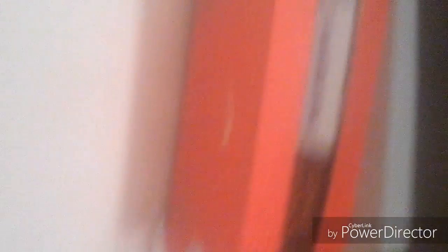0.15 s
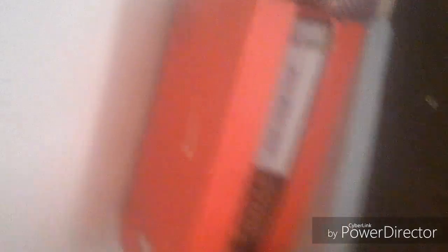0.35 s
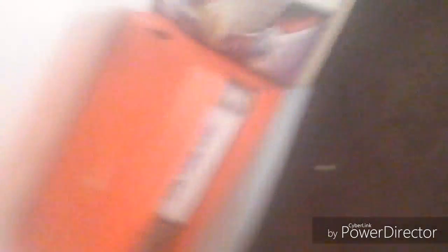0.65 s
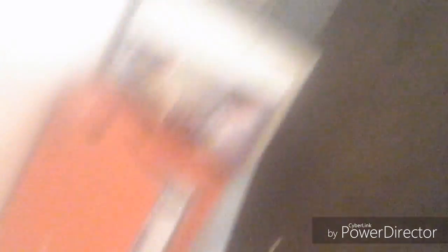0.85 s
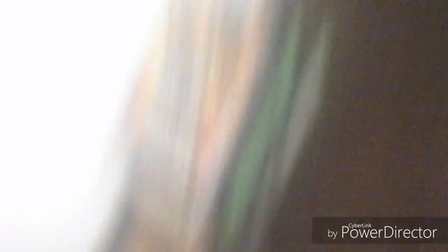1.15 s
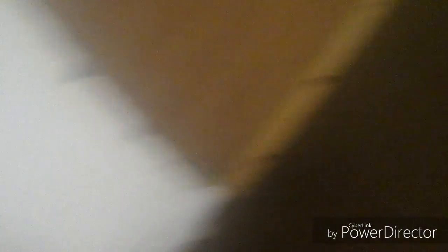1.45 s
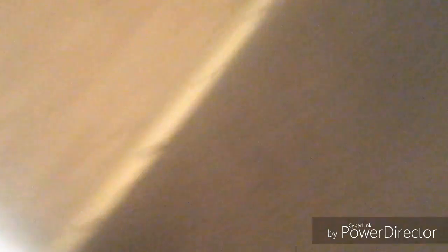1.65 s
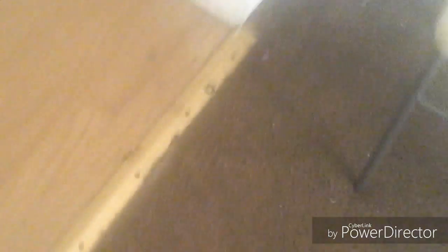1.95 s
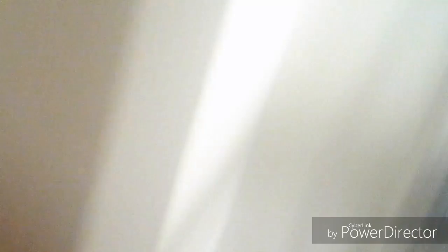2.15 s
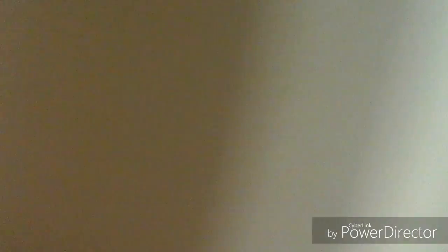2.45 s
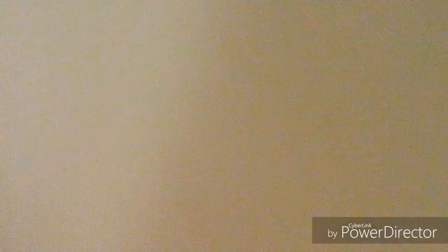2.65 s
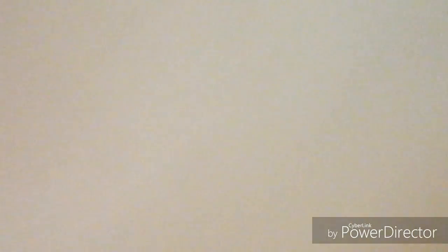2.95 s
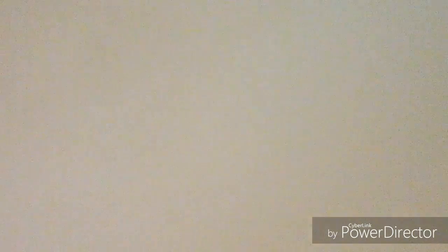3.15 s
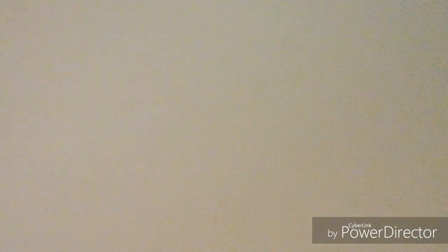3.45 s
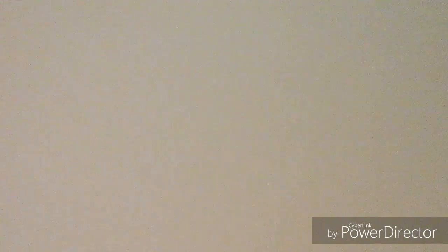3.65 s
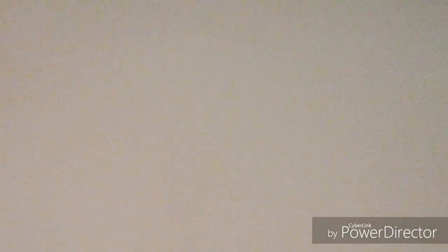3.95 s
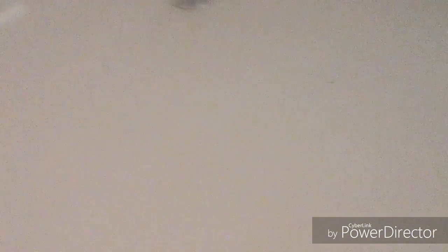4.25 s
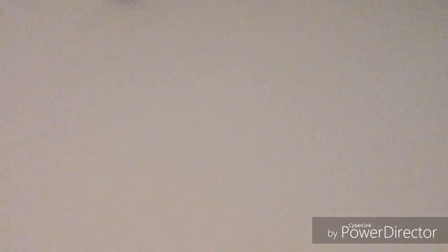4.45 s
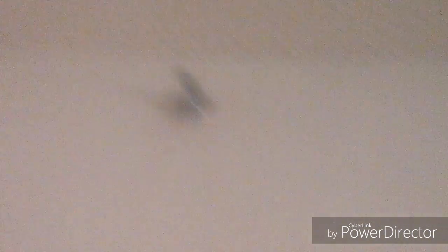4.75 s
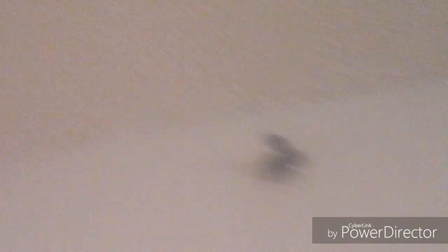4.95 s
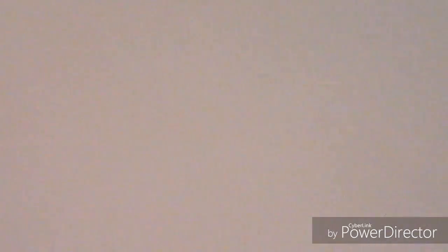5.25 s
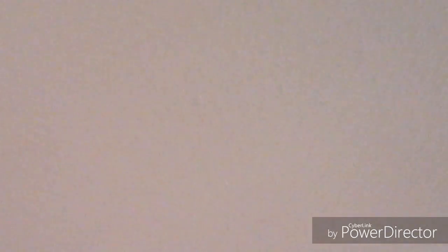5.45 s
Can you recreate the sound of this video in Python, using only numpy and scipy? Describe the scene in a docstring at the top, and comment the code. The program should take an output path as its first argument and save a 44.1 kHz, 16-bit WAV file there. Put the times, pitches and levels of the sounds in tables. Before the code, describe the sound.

Very close handling noise on a small camera's microphone dominates. Low bumps lead to one hard crack, rapid knocks, palm rubbing and a brief low groan, then a rough fingertip squeak that jumps up in pitch and ends in a knock. Before and after, dull footsteps from the floor above thump softly in a still indoor room with faint hiss and low hum.

```python
"""In a flat, dull footfalls come through the ceiling while someone swings a small camera up to point at it.
The footfalls are damped low modes of the ceiling; the hand's knocks push the case and ring its modes.
Friction makes the rubs, a groan and a sleeve's brush as clumped noise or slow slipping tones, and
stick-slip makes a loud squeaky scrape. Handling travels through the case, so it is dry; footfalls ring on.
Under it all lie still room air, microphone hiss and a faint low drone."""
import sys
import numpy as np
from scipy import signal
from scipy.fft import rfft, irfft
from scipy.io import wavfile
from scipy.ndimage import uniform_filter1d

SR = 44100
rng = np.random.default_rng(int(sys.argv[2]) if len(sys.argv) > 2 else 0)


def output_pcm(signal):
    """Save a mono or channel-first signal as 16-bit PCM at the path in sys.argv[1].

    Samples are clipped to [-1, 1] before scaling.
    """
    pcm = np.clip(np.atleast_2d(signal).T, -1, 1) * 32767
    wavfile.write(sys.argv[1], SR, np.round(pcm).astype(np.int16))


N = 246474
TIME = np.arange(N) / SR
EDGE_HZ = 15550  # upper band limit


def amp(db):
    """Level law: decibels to amplitude gain."""
    return 10 ** (np.asarray(db) / 20)


def unit(x):
    """Power normalisation: scales to rms 1."""
    return x / np.sqrt(np.mean(x ** 2) + 1e-20)


def crest(x):
    """Peak normalisation: scales the Hilbert envelope to a peak of 1."""
    return x / abs(signal.hilbert(x)).max()


def add(mix, s, sound):
    """Linear superposition: adds a sound to the mix from time s, in place."""
    part = mix[max(round(s * SR), 0):][:len(sound)]
    part += sound[:len(part)]


def curves(rows, t):
    """Linear interpolation: one curve for each column after the time column."""
    s, *columns = np.transpose(rows)
    return [np.interp(t, s, column) for column in columns]


def response(points, size=4096):
    """Minimum phase: the causal impulse response whose phase follows from its log spectrum."""
    hz, db = np.transpose(points)
    bin_hz = abs(np.fft.fftfreq(size, 1 / SR)) + 1  # the 1 avoids log of zero
    log_gain = np.log(amp(np.interp(np.log(bin_hz), np.log(hz), db)))
    spectrum = np.exp(np.conj(signal.hilbert(log_gain)))
    return np.fft.ifft(spectrum).real[:size // 2]


def colour(x, points):
    """Linear filtering: shapes x by a spectrum and scales it to rms 1."""
    return unit(signal.oaconvolve(x, response(points))[:len(x)])


def band(x, low_hz, high_hz, order=4):
    """Butterworth band-pass: maximally flat between its edges."""
    edges = [low_hz, min(high_hz, SR / 2 - 1)]
    return signal.sosfilt(signal.butter(order, edges, "band", fs=SR, output="sos"), x)


def wander(hz):
    """Band-limited Gaussian noise: random change slower than a given rate, rms 1."""
    spectrum = rfft(rng.standard_normal(N))
    return unit(irfft(spectrum * (np.fft.rfftfreq(N, 1 / SR) < hz), N))


def friction(points, grain_db, grain_hz):
    """Sliding friction: noise that comes in clumps as the surfaces catch."""
    clumps = amp(grain_db * wander(grain_hz))
    return colour(rng.standard_normal(N) * clumps, points)


# Still air of the room and microphone hiss. Each row: frequency in Hz, relative density in dB per Hz.
AIR = [(15, -37.5), (25, -12), (48, -6.5), (126, 8.5), (331, -12.5), (368, -11), (457, -2.5), (567, -19),
       (1240, -21.5), (1340, -30.5), (1800, -35), (2490, -34), (15500, -36.5)]


def room_air(level_db=-72):
    """Stationary noise: a steady random floor with a fixed spectrum."""
    return amp(level_db) * colour(rng.standard_normal(N), AIR)


# Rise and fall of the drone. Each row: time in seconds, level in dB.
DRONE_LEVEL = [(0, -63), (.7, -62.5), (1.5, -62), (3.9, -62.5), (4.3, -61.5), (4.45, -69.5), (4.6, -62),
               (5.58, -67.5)]
# Spectrum of the drone. Each row: frequency in Hz, relative density in dB per Hz.
DRONE_COLOUR = [(20, -13.5), (50, -5), (85, -5), (118, -2), (150, -8), (220, -24), (500, -50)]


def drone():
    """Amplitude modulation: faint low noise swells and sinks."""
    level_db, = curves(DRONE_LEVEL, TIME)
    return amp(level_db) * colour(rng.standard_normal(N), DRONE_COLOUR)


# Footfalls overhead. Each row: start in seconds, level in dB before the mode levels,
# pitch of the ceiling in Hz, decay time t60 in seconds.
STEPS = [(0.746, -46.5, 88.5, 0.64), (.835, -49.5, 82.6, 0.32), (1.515, -37, 116, 0.058),
         (3.534, -34.5, 142, 0.11), (3.603, -44, 66.4, 0.22), (3.736, -38.5, 122, 0.16),
         (4.099, -54.5, 56, 0.47), (4.224, -45, 187.4, 0.16), (4.581, -47.5, 132.5, 0.27),
         (4.66, -44.5, 62, 0.23), (5.188, -45, 109, 0.15)]
# Modes of the ceiling. Each row: multiple of its pitch, level in dB.
CEILING_MODES = [(1, 4), (1.17, 0), (.62, -7), (1.9, -31), (3.1, -43)]
# Low spectrum of the footfall rumble and the palm's drag. Each row: frequency in Hz, relative density in dB per Hz.
DRAG_COLOUR = [(20, -21.5), (45, -11), (80, 0), (120, 0), (190, -0.5), (300, -2), (420, -14), (700, -24),
               (1500, -62)]


def footfalls(rise_s=0.01, rumble_db=-11):
    """Modal excitation: each heel sets a few damped low ceiling modes swinging; the room adds a rumble."""
    out = np.zeros(N)
    t = np.arange(SR // 2) / SR
    for s, level_db, hz, t60 in STEPS:
        swing = sum(amp(mode_db) * np.sin(2 * np.pi * hz * multiple * t) for multiple, mode_db in CEILING_MODES)
        rumble = amp(rumble_db) * colour(rng.standard_normal(len(t)), DRAG_COLOUR)
        envelope = amp(level_db - 60 * t / t60) * (1 - np.exp(-t / rise_s))
        add(out, s, envelope * (swing + rumble))
    return out


# A hollow tone as the hand cups the case. Each row: time in seconds, centre in Hz, level in dB.
HOLLOW = [(3.63, 1280, -91), (3.67, 1330, -66), (3.72, 1380, -73), (3.77, 1400, -74), (3.84, 1330, -78),
          (3.9, 1300, -91)]


def hollow(half_width_hz=120):
    """Narrow-band resonance: rubbing noise is confined around one moving centre frequency."""
    hz, level_db = curves(HOLLOW, TIME)
    angle = 2 * np.pi * np.cumsum(hz) / SR
    sounding = (TIME > HOLLOW[0][0]) * (TIME < HOLLOW[-1][0])
    tone = wander(half_width_hz) * np.cos(angle) + wander(half_width_hz) * np.sin(angle)
    return sounding * amp(level_db) * tone


# Spectrum of cloth on the case. Each row: frequency in Hz, relative density in dB per Hz.
BRUSH_COLOUR = [(40, -27), (90, -4), (200, -1.5), (380, -1.5), (520, -6), (720, -6.5), (1000, -11.5),
                (1500, -16), (2050, -24), (2600, -17), (3200, -24.5), (4400, -31.5), (5300, -46.5),
                (8000, -67)]


def brush(start_s=1.645, attack_s=0.013, hold_s=0.012, level_db=-40, fade_db_per_s=126):
    """Textile friction: a sleeve lands on the case and slides off with an exponential fade."""
    t = TIME - start_s
    fade_db = fade_db_per_s * np.maximum(t - attack_s - hold_s, 0)
    envelope = np.clip(t / attack_s, 0, 1) * amp(level_db - fade_db)
    return envelope * friction(BRUSH_COLOUR, grain_db=1.5, grain_hz=200)


# The hand sliding faster and slower. Each row: time in seconds, level of the sliding rasp in dB.
RUB = [(0, -83.5), (1.45, -77), (1.85, -69.5), (1.94, -42.5), (2.04, -54.5), (2.25, -46.5), (2.42, -54.5),
       (2.49, -47.5), (2.6, -56.5), (2.73, -52.5), (2.88, -48.5), (3.02, -31), (3.18, -69.5), (3.42, -70),
       (3.68, -67.5), (4.05, -77), (4.28, -73), (4.45, -84.5), (4.62, -75), (4.9, -71), (5.01, -62.5),
       (5.14, -69.5), (5.58, -83)]
# Shoves as the hand shifts its grip. Each row: time of the height in seconds, length in seconds,
# drag level in dB, hiss relative to drag in dB.
SHOVES = [(1.535, 0.14, -48.5, -56), (1.884, .07, -41, -21), (1.983, 0.12, -36, -19.5),
          (2.246, 0.024, -30.5, -9), (2.275, 0.19, -39.5, -13), (2.386, 0.23, -40.5, -13.5),
          (2.696, 0.15, -33, -25), (2.748, .22, -53, -12.5), (2.876, .16, -50.5, -6.5),
          (3.077, 0.19, -37, -13), (3.278, 0.12, -36, -24), (3.493, 0.089, -44, -27.5),
          (3.631, 0.23, -52.5, -44), (3.858, 0.15, -52, -42), (4.275, .11, -46.5, -42),
          (4.68, 0.2, -52, -50), (4.897, 0.2, -44.5, -29.5), (5.023, 0.25, -44.5, -42),
          (5.295, 0.16, -46.5, -32.5)]
# The drag lies above the sliding rasp (dB) until it levels off (dB).
DRAG_OVER_DB, DRAG_LIMIT_DB = 12, -41.5
# The hiss relative to the rasp (dB) when the rasp is at FAST_DB, and its extra growth (dB per dB).
HISS_OVER_DB, FAST_DB, HISS_GROWTH = -14, -45, .14
# A shove swells for this share of its length and fades for the rest, by this many dB each way.
SHOVE_RISE, SHOVE_DEPTH_DB = .42, 19.5
# A shove's rasp relative to its drag (dB), plus this share of its hiss relative to drag.
SHOVE_RASP_DB, SHOVE_RASP_SHARE = -7, 0.28


def hand():
    """Power summation: gains of drag, rasp and hiss follow the sliding, and each shove adds a swell."""
    slide_db, = curves(RUB, TIME)
    drag = 1 / (amp(-slide_db - DRAG_OVER_DB) + amp(-DRAG_LIMIT_DB))
    hiss = amp(slide_db + HISS_OVER_DB + HISS_GROWTH * (slide_db - FAST_DB))
    power = np.array([drag, amp(slide_db), hiss]) ** 2
    for s, length_s, drag_db, hiss_db in SHOVES:
        before = (s - TIME) / SHOVE_RISE
        after = (TIME - s) / (1 - SHOVE_RISE)
        away = np.maximum(before, after) / length_s
        near = away < 2  # farther off the shove is left out
        rasp_db = SHOVE_RASP_DB + SHOVE_RASP_SHARE * hiss_db
        shares = amp([[0], [rasp_db], [hiss_db]])
        power[:, near] += (shares * amp(drag_db - SHOVE_DEPTH_DB * away[near])) ** 2
    return np.sqrt(power)


# Spectrum of the skin's rasp. Each row: frequency in Hz, relative density in dB per Hz.
RASP_COLOUR = [(150, -25), (350, 1), (550, 7.5), (850, -0.5), (1250, -3.5), (1600, -7), (2200, -16),
               (3200, -30), (6000, -51)]
# Spectrum of the skin's hiss. Each row: frequency in Hz, relative density in dB per Hz.
HISS_COLOUR = [(1000, -29), (2000, 1.5), (2700, 4.5), (3600, 2), (4300, -5), (5200, -5.5), (7200, -9),
               (7800, -1.5), (8600, 1.5), (9500, -9.5), (10800, -7.5), (12000, -14), (14000, -16),
               (15500, -15.5)]


def rubbing(catch_per_s=45, catch_db=-6, catch_spread_db=4):
    """Friction noise: the palm drags lumpily while the skin rasps, hisses and catches at random instants."""
    drag, rasp, hiss = hand()
    catches = (rng.random(N) < catch_per_s / SR) * amp(catch_spread_db * rng.standard_normal(N))
    rumble = friction(DRAG_COLOUR, grain_db=2.5, grain_hz=55.6)
    scratch = friction(RASP_COLOUR, grain_db=2.5, grain_hz=250) + amp(catch_db) * colour(catches, RASP_COLOUR)
    sizzle = friction(HISS_COLOUR, grain_db=2.0, grain_hz=505)
    return drag * rumble + rasp * scratch + hiss * sizzle


# The palm's groan. Each row: time in seconds, mean pitch in Hz, level in dB,
# step from each partial to the next in dB.
GROAN = [(2.084, 116.8, -57, -21), (2.091, 128, -29.5, -18), (2.112, 130, -32, -22), (2.124, 142, -35, -16),
         (2.135, 303, -41, -15), (2.15, 280, -34.5, -9.5), (2.175, 244, -45.5, -8), (2.2, 250, -27.5, -6.5),
         (2.222, 270, -50, -7)]


def groan(waver=0.019, waver_hz=80):
    """Periodic slip: the slowly dragging palm gives a wavering tone with weak harmonics."""
    hz, level_db, overtone_db = curves(GROAN, TIME)
    angle = 2 * np.pi * np.cumsum(hz * (1 + waver * wander(waver_hz))) / SR
    tone = sum(amp(overtone_db * k) * np.sin((k + 1) * angle) for k in range(3))
    sounding = 1. * (TIME > GROAN[0][0]) * (TIME < GROAN[-1][0])
    return amp(level_db) * tone * uniform_filter1d(sounding, size=200)  # softened ends


# Knocks on the case. Each row: start in seconds, thud peak in dB, thud pitch in Hz, clack peak in dB,
# hardness as the frequency in Hz that the contact favours.
KNOCKS = [(0.0731, -44.5, 326, -56, 650), (.088, -44.5, 354, -61, 600), (0.14, -42.5, 392, -50, 915),
          (1.0674, -31.5, 380, -45, 628), (1.0785, -26, 354, -36.5, 915), (1.0846, -34.5, 200, -45.5, 576),
          (1.098, -48, 250, -49, 900), (1.3446, -32.5, 290, -46.5, 855), (1.6093, -46, 259, -46.5, 750),
          (1.6506, -31, 173, -33.5, 580), (1.8628, -7, 195, -7.5, 1480), (1.869, -11.5, 110, -18.5, 1470),
          (1.9291, -28.5, 207, -29, 1640), (1.9424, -24, 240, -27, 1670), (1.9632, -30, 238, -31, 2020),
          (1.9791, -21.5, 315, -22.5, 1010), (1.9828, -25.5, 300, -27.5, 1900),
          (1.9913, -21.5, 300, -40, 1250), (2.0016, -20, 350, -29, 1570), (2.067, -20, 293, -25.5, 1150),
          (2.1098, -46, 173, -32, 2100), (2.1989, -22, 300, -19, 1260), (2.249, -19, 260, -13, 1290),
          (2.618, -29, 207, -38, 1000), (2.6241, -31, 221, -23, 1870), (2.661, -42, 260, -33, 750),
          (2.667, -23, 183, -24.5, 780), (2.6848, -22, 229, -24, 765), (2.695, -23, 200, -26.5, 800),
          (2.7935, -29, 276, -26, 835), (2.8406, -36, 243, -33, 900), (2.8747, -23, 298, -28, 950),
          (2.982, -31.5, 280, -22, 2495), (3.0979, -17.5, 277, -15, 1630), (3.107, -30, 250, -30, 1400),
          (3.4788, -34, 268, -47.5, 760), (3.5028, -32.5, 262, -52.5, 800),
          (3.8564, -29.5, 257, -30.5, 972), (4.2717, -44, 200, -43, 980), (4.6874, -36.5, 167, -42.5, 940),
          (4.852, -27.5, 226, -28, 1110), (4.8866, -25, 198, -29, 1150), (4.9264, -35, 233, -40, 750),
          (4.9406, -34.5, 210, -34.5, 1200), (5.2169, -37, 231, -44, 2400),
          (5.2801, -28.5, 258, -49.5, 1900), (5.3045, -41, 252, -42, 1900)]
# Modes of the case. Each row: frequency in Hz, decay time t60 in seconds, level in dB relative to the others.
CASE_MODES = [(547, 0.007, -20.5), (754, 0.0094, 19.5), (1150, 0.013, 5), (1419, 0.0039, -3.5),
              (1900, 0.0079, 0), (2400, .004, 3), (3330, 0.00308, -14)]
# Spectrum of the sharp contact. Each row: frequency in Hz, relative gain in dB.
TICK_COLOUR = [(500, -29.5), (2500, 8.5), (4500, 2.5), (6500, -7.5), (8600, 1), (10500, -1.5),
               (12500, -13.5), (16000, -10.5)]
# How the case passes a soft push to the microphone. Each row: frequency in Hz, relative gain in dB.
PUSH_PATH = [(20, -38), (45, -13.5), (90, -4), (130, -5), (570, -0.5), (720, -10.5), (1400, -3),
             (1650, -15.5), (2600, -12.5), (3800, -42), (9000, -62.5)]
# Tick relative to clack at HARD_HZ (dB), and its growth with hardness (dB per octave).
HARD_HZ, TICK_DB, TICK_DB_PER_OCTAVE = 1000, -18, 15.5


def knocks(thud_cycles=3.8, spread=0.1118, focus_db=6, reach_hz=1700, chatter=0.22, chatter_t60=0.0087):
    """Impact excitation: a knock pushes the case (thud), rings its modes (clack) and ticks at the contact."""
    out = np.zeros(N)
    t = np.arange(4096) / SR
    contact, path = response(TICK_COLOUR), response(PUSH_PATH)
    for s, thud_db, thud_hz, clack_db, spot_hz in KNOCKS:
        swing = np.sin(2 * np.pi * thud_hz * t) * amp(-60 * t * thud_hz / thud_cycles)
        push = signal.fftconvolve(swing, path)[:len(t)]
        # the grip detunes the modes; those far in pitch from what the contact favours stay weak
        detune = np.exp(spread * rng.standard_normal(len(CASE_MODES)))
        ring = np.zeros(len(t))
        for (hz, t60, mode_db), shift in zip(CASE_MODES, detune):
            focus = focus_db * np.log2(hz / spot_hz) ** 2
            ring += amp(mode_db - focus - 60 * t / t60) * np.sin(2 * np.pi * hz * shift * t)
        ring = band(ring, low_hz=300, high_hz=spot_hz + reach_hz, order=3)
        # one impulse, then dying chatter
        touch = (t == 0) + chatter * rng.standard_normal(len(t)) * amp(-60 * t / chatter_t60)
        snap = signal.fftconvolve(touch, contact)[:len(t)]
        # a harder contact ticks more
        tick_db = clack_db + TICK_DB + TICK_DB_PER_OCTAVE * np.log2(spot_hz / HARD_HZ)
        add(out, s, amp(thud_db) * crest(push) + amp(clack_db) * crest(ring) - amp(tick_db) * crest(snap))
    return out


# Squeaks of the fingertip. Each row: start in seconds, hold in seconds, level in dB that it swells towards.
SQUEAKS = [(2.712, 0.017, -27.5), (2.922, 0.011, -13), (2.946, 0.1137, -13), (3.082, 0.0087, -9.5)]


def finger(attack_s=0.005, swell_db=12.5, swell_s=0.047, fade_db_per_s=1151):
    """Normal force: the fingertip catches, bears down in an exponential swell, and lets go."""
    out = np.zeros(N)
    t = np.arange(SR // 4) / SR
    for s, held_s, level_db in SQUEAKS:
        swell = -swell_db * np.exp(-t / swell_s)
        fade = -fade_db_per_s * np.maximum(t - held_s, 0)
        add(out, s, np.minimum(t / attack_s, 1) * amp(level_db + swell + fade))
    return out


# Speed of the fingertip. Each row: time in seconds, mean slips per second.
SLIP_RATE = [(2.745, 305), (2.923, 560), (2.94, 605), (2.947, 245), (2.977, 300), (2.994, 680),
             (3.006, 440), (3.018, 850), (3.025, 630), (3.031, 630), (3.036, 1200), (3.041, 1340),
             (3.047, 1190), (3.052, 780), (3.058, 660), (3.065, 1220), (3.083, 900), (3.089, 300)]
# What the slips ring in the case. Each row: frequency in Hz, relative gain in dB.
SLIP_COLOUR = [(60, -33), (250, -6), (420, -15.5), (600, 0), (800, 4.5), (1000, 0.5), (1220, 2.5),
               (1450, -8), (1900, -3.5), (2400, -14), (3100, -27.5), (4600, -29), (6400, -38.5),
               (8600, -30.5), (11000, -36.5), (15000, -54.5)]


def stick_slip(roughness=.4, steady_hz=640, steady_width_hz=90, jitter=.4, uneven_db=5, grit=.016,
               smooth_hz=1020, smooth_width_hz=70, octave_db=-23, pure_db=-1, pure_db_per_octave=-18):
    """Stick-slip oscillation: slips kick the case, unevenly when slow; fast sliding is purer and softer."""
    rate, = curves(SLIP_RATE, TIME)
    rough = roughness * (.5 - .5 * np.tanh((rate - steady_hz) / steady_width_hz))
    pressure = finger()
    turns = np.cumsum((pressure > 0) * rate * np.exp(jitter * rough * wander(300))) / SR
    # harmonics in phase make one sharp kick a slip
    kicks = sum(np.cos(2 * np.pi * k * turns) * (k * rate < EDGE_HZ) for k in range(1, 50))
    kicks = kicks * np.sqrt(rate / SR)
    kicks = kicks * amp(uneven_db * rough * wander(350))
    kicks = kicks + grit * (1 + 4 * abs(kicks / amp(0))) * rng.standard_normal(N)
    scrape = signal.oaconvolve(kicks, response(SLIP_COLOUR))[:N]
    # the pressure of the finger sets the power, however fast the slips come
    power = uniform_filter1d(uniform_filter1d(scrape ** 2, size=260), size=260)
    scrape = scrape / np.sqrt(abs(power) + 1e-9)
    # at high speed the finger no longer sticks
    pure = np.sqrt(2) * (np.cos(2 * np.pi * turns) + amp(octave_db) * np.cos(4 * np.pi * turns))
    sticking = .5 - .5 * np.tanh((rate - smooth_hz) / smooth_width_hz)
    octaves_above = np.log2(np.maximum(rate / smooth_hz, 1))
    pure_gain = amp(pure_db + pure_db_per_octave * octaves_above)
    return pressure * (sticking * scrape + (1 - sticking) * pure_gain * pure)


def scene():
    """Superposition: room air, drone, footfalls and handling add at one microphone."""
    background = room_air() + drone() + footfalls()
    handling = hollow() + brush() + rubbing() + groan() + knocks() + stick_slip()
    return (background + handling)[None]


def record(dry, low_cut_hz=36):
    """Band limitation: the small microphone loses the deepest bass, then a steep low-pass ends the treble."""
    thin = signal.sosfilt(signal.butter(2, low_cut_hz, "high", fs=SR, output="sos"), dry)
    low_pass = signal.firwin(511, EDGE_HZ, window=("kaiser", 9), fs=SR)
    return signal.oaconvolve(thin, low_pass[None], "same")


dry = scene()
out = record(dry)
output_pcm(out)
```